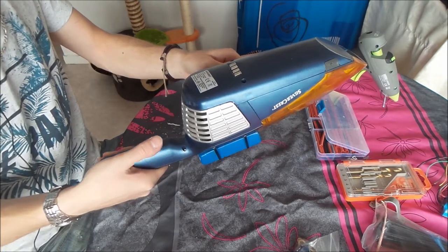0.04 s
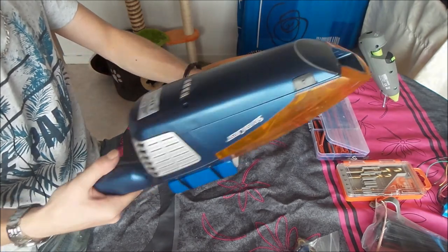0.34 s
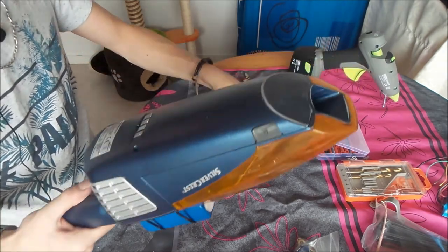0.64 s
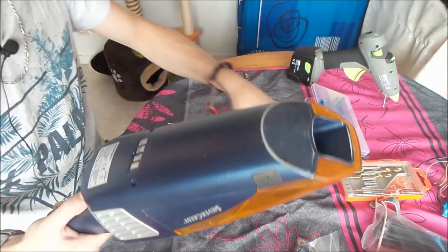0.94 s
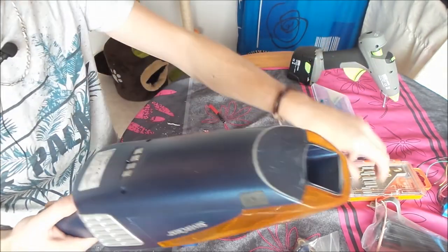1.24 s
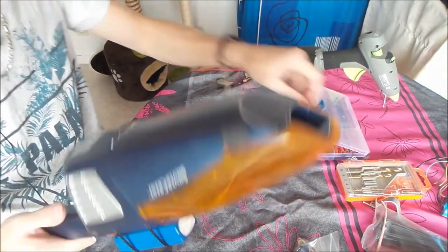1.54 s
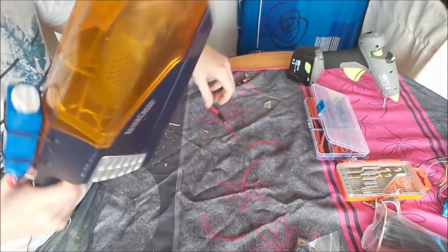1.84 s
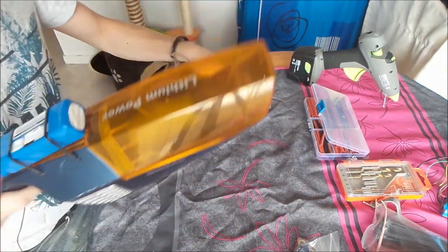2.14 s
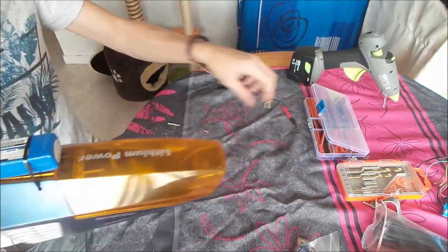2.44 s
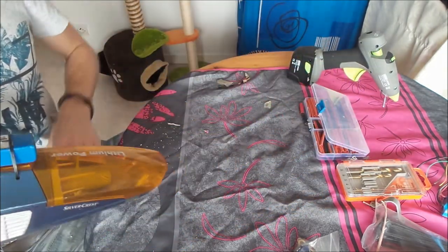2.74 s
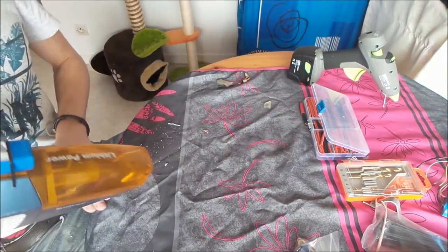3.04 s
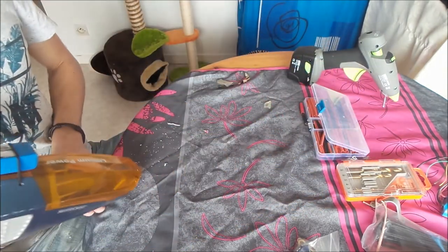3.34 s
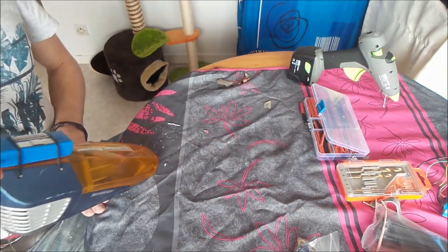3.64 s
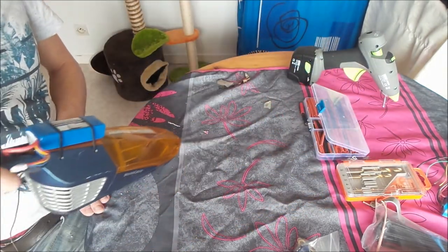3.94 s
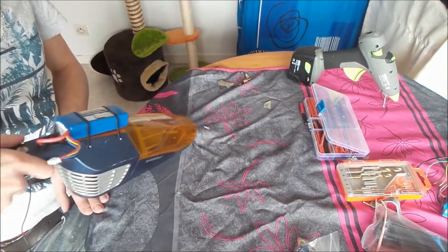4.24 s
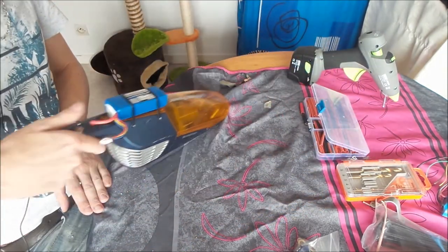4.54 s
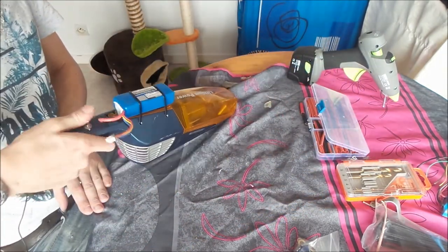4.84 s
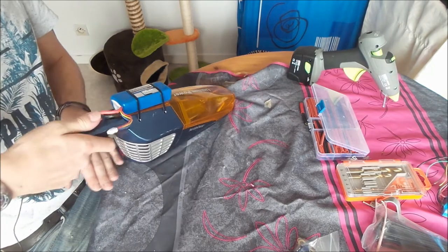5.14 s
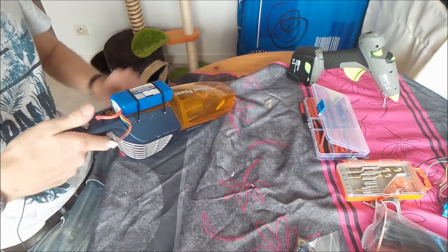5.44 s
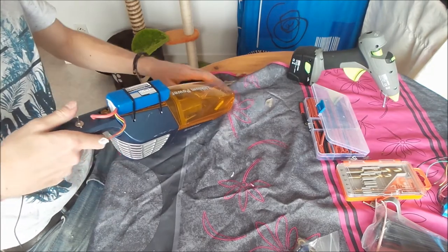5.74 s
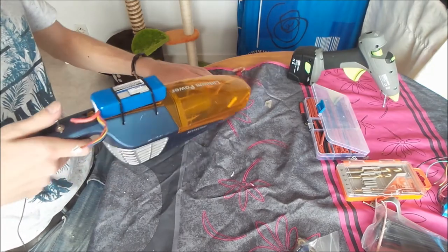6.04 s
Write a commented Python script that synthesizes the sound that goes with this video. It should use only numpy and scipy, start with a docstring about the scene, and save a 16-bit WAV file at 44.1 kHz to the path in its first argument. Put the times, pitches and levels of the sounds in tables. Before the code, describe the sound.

Hands turn over a cordless handheld vacuum, its plastic shell ticking, knocking and faintly rubbing. The switch snaps sharply and the small motor spins up fast to a whine over rushing air. A loose bearing soon adds a rough rattle and rasp. Another sharp click cuts the power and the fan coasts down in falling pitch. Everything is close to one microphone in a small, quiet room.

```python
"""A cordless handheld vacuum, close to one microphone in a small, quiet room.
Turned over in the hands, its plastic shell ticks, knocks and rubs. The switch snaps, the motor spins up
to a whine of shaft orders (multiples of its speed) over rushing air, and a loose bearing starts to rattle.
The switch is let go and the fan coasts down, shuddering at its critical speed, its orders sliding
through the housing's resonances."""
import sys
import numpy as np
from scipy import signal
from scipy.fft import rfft, irfft
from scipy.io import wavfile
from scipy.ndimage import uniform_filter1d

SR = 44100
rng = np.random.default_rng(int(sys.argv[2]) if len(sys.argv) > 2 else 0)


def digitize_waveform(pressure):
    """Quantize a signal to 16-bit integers and store it at the path in sys.argv[1].

    Rows of a 2-D input are taken as channels; values are limited to [-1, 1].
    """
    field = np.atleast_2d(pressure).T
    bounded = np.clip(field, -1, 1)
    quanta = np.round(bounded * 32767).astype(np.int16)
    wavfile.write(sys.argv[1], SR, quanta)


N = 272538
TIME = np.arange(N) / SR
ON_S, OFF_S = 2.984, 5.172  # the switch is pressed and let go
GRAZE_S, GRAZE_WIDTH_S = 4.786, 0.38  # the loose shaft grazes the bearing plate


def undb(db):
    """Decibels to gain."""
    return 10 ** (np.asarray(db) / 20)


def unit(x):
    """Scale to rms 1."""
    return x / np.sqrt(np.mean(x ** 2))


def since(start_s):
    """Seconds since a moment, 0 before it."""
    return np.maximum(TIME - start_s, 0)


def bell(centre_s, width_s):
    """A smooth swell from 0 to 1 and back."""
    return np.exp(-((TIME - centre_s) / width_s) ** 2)


def walk(rate_hz):
    """Random drift of rms 1 that changes course about rate_hz times a second."""
    steps = rng.standard_normal(4096)
    return unit(np.interp(TIME * rate_hz, np.arange(len(steps)), steps))


def colour(x, points):
    """Filter by a spectrum of points: frequency_hz, gain_db."""
    hz, db = np.transpose(points)
    bins_hz = np.fft.rfftfreq(2 * N, 1 / SR)
    gain = undb(np.interp(np.log(bins_hz + 1), np.log(hz), db))
    return irfft(rfft(x, 2 * N) * gain)[:N]


def resonate(x, modes):
    """Ring parallel resonances: pitch_hz, width_hz, gain_db."""
    out = 0
    for hz, width_hz, db in modes:
        b, a = signal.iirpeak(hz, hz / width_hz, fs=SR)
        out = out + undb(db) * signal.lfilter(b, a, x)
    return out


def edge(x, hz, kind, order=2):
    """Low-pass or high-pass."""
    return signal.sosfilt(signal.butter(order, hz, kind, fs=SR, output="sos"), x)


def room(x, t60_s=0.66, dull_hz=3240):
    """Diffuse echo of the small room; soft furnishings take the treble sooner."""
    t = TIME[:SR // 2]
    noise = rng.standard_normal(len(t))
    low = edge(noise, dull_hz, "low", order=1)
    tail = low * undb(-60 * t / t60_s) + 2.4 * (noise - low) * undb(-60 * t / (0.38 * t60_s))
    tail = tail * (t > .004)  # the first reflection reaches the microphone after 4 ms
    return signal.fftconvolve(x, tail / np.sqrt(np.sum(tail ** 2)))[:N]


def room_tone(level_db=-65, handling_db=3):
    """Faint room noise, lifted by the rustle of cloth once the vacuum is turned over."""
    # spectrum of the still room: frequency_hz, density_db
    still_room = [(30, -41), (90, -19), (170, -9), (300, -10), (450, -10.5), (750, -15), (1200, -17.5),
                  (2400, -27.5), (6000, -32), (15000, -31.5)]
    moving = np.clip((TIME - 1.6) / 0.7, 0, 1)
    noise = unit(colour(rng.standard_normal(N), still_room))
    return noise * undb(level_db + handling_db * moving + 0.54 * walk(4.9))


def clicks(body_ring=1.93, treble_ring=0.87):
    """Each blow rings the plastic and thuds in the struck part; the thud outlasts the treble."""
    # blows on shell and switch: start_s, level_db, body_hz, body_db, treble_db, mid_t60_s, room_db
    blows = [(0.042, -43.5, 445, 3, -11, 0.023, 8), (1.299, -28, 643, -7, -2.5, 0.03, 5),
             (1.442, -40, 700, -22, 1, 0.022, -3), (1.707, -48.5, 600, -1, -23, 0.018, 12),
             (1.742, -38.5, 700, -5, -2, 0.026, 3), (1.776, -23.5, 480, 8.5, -6, 0.016, -1),
             (1.951, -19, 990, -9, 0.5, 0.039, -2), (2.063, -45, 910, -23, 10, .015, 0),
             (2.240, -41, 900, -21, -5.5, 0.013, -3), (2.394, -33.5, 930, 13, -20, 0.042, -8),
             (2.486, -35.5, 910, 2.5, 0, 0.064, -1), (2.523, -33, 530, 16, -20, 0.032, -3),
             (2.548, -44, 950, 4, -1, 0.019, -3), (2.578, -38, 503, 10, -20, 0.02, 11),
             (2.5935, -15, 584, -9, -6, 0.018, -5), (2.939, -40, 660, -21, -10, 0.014, 0),
             (2.9829, -2.5, 1010, -7, 12, 0.014, 0), (5.171, -2, 935, -12, 9, 0.0087, -14)]
    # ring of the struck plastic: pitch_hz, width_hz, gain_db
    plastic_modes = [(1860, 450, 14), (3200, 1400, 5), (5470, 990, -3), (6900, 2800, 1.5), (9550, 380, -43)]
    direct, to_room = np.zeros(N + SR), np.zeros(N + SR)
    t = TIME[:SR // 5]
    for start_s, level_db, body_hz, body_db, treble_db, mid_t60_s, room_db in blows:
        crackle = rng.standard_normal(len(t))
        ring = resonate(crackle, plastic_modes)
        body = [(body_hz, 0.9 * body_hz, 0)]
        fade_db = -60 * t / mid_t60_s
        thud = unit(resonate(resonate(crackle, body), body)) * undb(body_db + fade_db / body_ring)
        mid = unit(edge(edge(ring, 1870, "high"), 5200, "low")) * undb(fade_db)
        treble = unit(edge(ring, 3260, "high")) * undb(treble_db + fade_db / treble_ring)
        attack = 1 - np.exp(-t / 0.00033)
        blow = edge((thud + mid + treble) * attack, 315, "high", order=4)
        peak_rms = np.sqrt(uniform_filter1d(blow ** 2, size=88).max())  # loudest 2 ms
        blow = blow * undb(level_db - 7.0) / peak_rms
        at = int(start_s * SR)
        direct[at:at + len(t)] += blow
        to_room[at:at + len(t)] += blow * undb(room_db)
    return direct[:N] + undb(-4.5) * room(to_room[:N])


def rubs(grain_db=3.0):
    """Hands rub the shell and grit slides in the dust cup: grainy friction that swells and dies away."""
    # rubs and slides: peak_s, level_db, rise_s, fall_s, centre_hz, width_hz
    strokes = [(0.104, -52.5, 0.0096, 0.011, 2400, 6700), (.37, -66, 0.55, 0.25, 1190, 3000),
               (1.835, -28, 0.0053, 0.015, 2320, 1290), (1.845, -53, 0.064, 0.021, 5000, 9000),
               (2.06, -44, 0.045, 0.034, 3950, 11400), (2.384, -50, 0.0053, 0.0084, 4480, 7000),
               (2.55, -51, 0.094, 0.081, 730, 890), (2.64, -50, 0.023, 0.026, 2900, 1800),
               (2.87, -57, 0.012, .014, 1500, 3500)]
    out = 0
    for peak_s, level_db, rise_s, fall_s, centre_hz, width_hz in strokes:
        grains = rng.standard_normal(N) * undb(grain_db * walk(500))
        swell = np.exp(-np.maximum((peak_s - TIME) / rise_s, (TIME - peak_s) / fall_s))
        out = out + undb(level_db) * swell * unit(resonate(grains, [(centre_hz, width_hz, 0)]))
    return out + undb(-11.0) * room(out)


def metal_ring(tap_s=1.298, gain_db=-50):
    """A tap leaves small metal parts ringing."""
    # partials of the metal parts: pitch_hz, level_db, t60_s
    partials = [(3020, -12, .15), (3806, -3, 0.18), (5330, -7, 0.15), (7000, -6, 0.41), (8950, 2, 0.33),
                (9080, -7, 0.25), (10470, -9, 0.37)]
    t = since(tap_s)
    ring = sum(undb(db - 60 * t / t60_s) * np.sin(2 * np.pi * hz * t) for hz, db, t60_s in partials)
    return undb(gain_db) * ring


def shaft_speed(cruise_hz=368.3, step_hz=15.4, sag_hz=3.0, spin_up_s=0.103, coast_s=1.13, drag=0.238):
    """Turns a second: the motor closes in on cruising speed; once off, friction and air drag slow it."""
    stepped = (1 + np.tanh((TIME - 4.025) / .06)) / 2  # the speed steps up a little at about 4 s
    driven_hz = cruise_hz + step_hz * stepped - sag_hz * bell(GRAZE_S, GRAZE_WIDTH_S)
    run_up = 1 - np.exp(-since(ON_S) / spin_up_s)
    friction = np.exp(-since(OFF_S) / coast_s)
    return driven_hz * run_up * friction / (1 + drag * (1 - friction))


def motor_states(strain_rise_s=0.052, strain_fall_s=0.19, loose_s=3.96, loosen_s=0.018, release_s=0.14):
    """Shares 0-1 of the motor's states: starting strain, smooth running, whirling, coasting."""
    age_s = since(ON_S)
    strain = (1 - np.exp(-age_s / strain_rise_s)) * np.exp(-age_s / strain_fall_s)
    loose = np.clip(since(loose_s) / loosen_s, 0, 1)
    driven = np.exp(-since(OFF_S) / release_s)
    return strain / strain.max(), 1 - loose, loose * driven, 1 - driven


def motor_gain(hz, strain_db, smooth_db, whirl_db, coast_db, power):
    """Gain of one sound: a level for each state times a power of the speed, plus the starting strain."""
    strain, smooth, whirling, coasting = motor_states()
    state = smooth * undb(smooth_db) + whirling * undb(whirl_db) + coasting * undb(coast_db)
    return np.hypot(strain * undb(strain_db), state * (hz / hz.max()) ** power)


def near_critical(hz, critical_hz=301.3, width_hz=36):
    """Nearness 0-1 to the speed at which the rotor shakes, on the way up and on the way down."""
    return np.exp(-((hz - critical_hz) / width_hz) ** 2)


def orders(turn, strengths_db, slow_db, rough):
    """Multiples of the shaft angle from the third up; each swells and flutters in the turbulent air."""
    out = 0
    for order, db in enumerate(strengths_db, start=3):
        angle = order * turn + rng.uniform(0, 2 * np.pi) + rough * walk(60)
        out = out + undb(db + slow_db * walk(6.5)) * (1 + rough * walk(50)) * np.sin(angle)
    return out


def rattle(turn, modes, low_hz, high_hz):
    """Scraping, strongest once a turn, rings a set of resonances."""
    scrape = rng.standard_normal(N) * (1 + np.cos(turn))
    ring = edge(resonate(scrape, modes), low_hz, "high", order=4)
    return unit(edge(ring, high_hz, "low", order=4))


def hum(turn, hz, strain_db=5, coast_db=-1.0):
    """Imbalance shakes the body once a turn, harder under torque; bearing play adds the second order."""
    # how well the body radiates the imbalance: speed_hz, level_db
    radiation = [(60, -92), (135, -49), (222, -43.5), (243, -31.5), (275, -19.5), (300, -18), (328, -25.5),
                 (358, -16), (382, -15)]
    strain, _, _, coasting = motor_states()
    radiated_db = np.interp(hz, *np.transpose(radiation))
    first = undb(radiated_db + strain_db * strain + coast_db * coasting + .5 * walk(12))
    second = motor_gain(hz, strain_db=-48, smooth_db=-29.5, whirl_db=-17.5, coast_db=-33.5, power=2.86)
    return first * np.sin(turn) + second * undb(1.2 * walk(25)) * np.sin(2 * turn)


def whine(turn):
    """Brushes and blades repeat on every turn."""
    # shaft orders, with 7, 14 and 21 lifted by the seven fan blades: order, level_db
    order_levels = [(3, -9), (4, -4), (5, -7), (6, -6), (7, -2), (8, -5), (9, -4), (10, -5), (11, -7),
                    (12, -5), (13, -8), (14, -1), (15, -4), (16, -2), (18, -1), (20, -6), (21, -1),
                    (22, -1), (24, -6), (25, -2), (26, -9), (27, 0), (28, -2), (31, -7), (41, -14)]
    strengths_db = np.interp(np.arange(3, 42), *np.transpose(order_levels))
    return orders(turn, strengths_db, slow_db=2, rough=.2)


def air(turn, depth=0.17, gust_db=1.3):
    """Turbulence behind the fan, pulsing with the shaft."""
    return rng.standard_normal(N) * (1 + depth * np.cos(turn)) * undb(gust_db * walk(28))


def fan(turn, hz, rush_db=13.0, vents_db=-4, critical_db=3, coast_whine_db=-3):
    """Whine and rush leave through housing and vents; the whine is clearest driven at full speed."""
    # what the housing lets out: frequency_hz, gain_db
    housing = [(25, -40), (70, -35), (200, -15), (300, -7.5), (480, -6), (700, -1), (1150, -2.5), (1470, 0),
               (2000, -9), (3400, -4), (5900, -10.5), (6400, -13.5), (8200, -14.5), (15500, -28.5)]
    # narrow resonances of the exhaust vents: pitch_hz, width_hz, gain_db
    vent_modes = [(5300, 150, -13), (6000, 210, 8), (7300, 77, -5), (8400, 150, 1), (9400, 90, -22),
                  (11000, 50, -8)]
    flow = motor_gain(hz, strain_db=-24, smooth_db=-21.0, whirl_db=-24.0, coast_db=-23, power=2.43)
    flow = flow * undb(critical_db * near_critical(hz))
    *_, coasting = motor_states()
    tones = undb(coast_whine_db * coasting) * (hz / hz.max()) ** 1.4 * whine(turn)
    through_housing = colour(tones + undb(rush_db) * air(turn), housing)
    return flow * (through_housing + undb(vents_db) * resonate(air(turn), vent_modes))


def bearing_chatter(turn, hz, scrape=0.03):
    """The shaft knocks in its bearing once a turn: a rough growl through the mount."""
    # resonances of the motor mount: pitch_hz, width_hz, gain_db
    mount_modes = [(840, 208, 1.5), (1210, 900, -9.5), (1713, 270, 0.5), (2480, 480, -16), (3590, 167, -1),
                   (5300, 280, -5), (7500, 400, -26)]
    gain = motor_gain(hz, strain_db=-22, smooth_db=-32, whirl_db=-26.5, coast_db=-27.5, power=0.88)
    knocks = orders(turn, np.zeros(44), slow_db=2, rough=.5)
    # the knocks are soft, and fewer a second carry less power
    knocks = edge(knocks, 3300, "low", order=4) * np.sqrt(hz / hz.max())
    growl = resonate(knocks + scrape * rng.standard_normal(N), mount_modes)
    return gain * edge(growl, 630, "high", order=6)


def shell_rattle(turn, hz):
    """The shell growls at the starting kick and rattles hard once the shaft is loose."""
    # resonances of the shell: pitch_hz, width_hz, gain_db
    shell_modes = [(858, 44, 1), (1449, 130, 4), (1672, 55, 13), (2280, 210, -1)]
    shaking = motor_gain(hz, strain_db=-31, smooth_db=-27, whirl_db=-16.5, coast_db=-16.5, power=2.3)
    kick = undb(-14.5) * bell(centre_s=3.075, width_s=0.046)
    return np.hypot(shaking, kick) * rattle(turn, shell_modes, low_hz=650, high_hz=2640)


def brush_hiss(turn, hz):
    """The motor's brushes hiss as they slide."""
    # resonances that the brushes hiss through: pitch_hz, width_hz, gain_db
    brush_modes = [(2550, 980, -18.5), (4500, 900, 20.5), (5320, 350, 15.5)]
    sliding = motor_gain(hz, strain_db=-27.5, smooth_db=-36.5, whirl_db=-28, coast_db=-32.5, power=1.5)
    return sliding * rattle(turn, brush_modes, low_hz=2240, high_hz=6060)


def shudder(turn, hz, gain_db=-19, coast_db=-4.0):
    """At the critical speed the rotor's knocks ring the motor case, more softly when it coasts."""
    # resonances of the motor case: pitch_hz, width_hz, gain_db
    case_modes = [(2010, 160, 7.5), (2520, 93, 4), (3120, 300, -10)]
    knocks = orders(turn, np.zeros(10), slow_db=1, rough=.3)
    ring = edge(resonate(knocks, case_modes), 2250, "high")
    *_, coasting = motor_states()
    return undb(gain_db + coast_db * coasting) * near_critical(hz) * ring


def whirl(turn, gain_db=-17, damped_db=-7, wobble_rad=0.36, flicker_db=3):
    """The loose shaft orbits a little slower than it spins: unsteady tones between the orders."""
    # whirl tones: multiple of the shaft speed, level_db
    whirl_tones = [(1.93, -4.5), (2.19, -13), (2.51, -12), (3.855, 1), (4.39, -11), (5.06, -10)]
    tones = sum(undb(db + flicker_db * walk(21.89)) * np.sin(multiple * turn + wobble_rad * walk(25))
                for multiple, db in whirl_tones)
    _, _, whirling, _ = motor_states()
    grazing = bell(centre_s=4.78, width_s=0.34)  # touching the plate damps the tones
    return whirling * undb(gain_db + damped_db * grazing) * tones


def plate_rasp(turn, level_db=-18):
    """Midway through its whirl the shaft grazes the bearing plate, which rasps."""
    # resonances of the bearing plate: pitch_hz, width_hz, gain_db
    plate_modes = [(3440, 88, -12), (3390, 61, 4), (3660, 180, -3)]
    rasp = rattle(turn, plate_modes, low_hz=2880, high_hz=4180)
    return undb(level_db) * bell(GRAZE_S, GRAZE_WIDTH_S) * rasp


def hollow_body(turn, hz, gain_db=-26, scrape=0.84):
    """The freewheeling shaft sounds the body: each order swells as it slides through a resonance."""
    # resonances of the hollow body: pitch_hz, width_hz, gain_db
    cavity_modes = [(855, 140, 11.5), (2620, 150, -1), (5570, 150, -8.5)]
    knocks = unit(orders(turn, np.zeros(22), slow_db=1, rough=.5))
    ring = resonate(knocks + scrape * rng.standard_normal(N), cavity_modes)
    *_, coasting = motor_states()
    gain = undb(gain_db) * coasting * (hz / hz.max()) ** 1.11
    return gain * unit(edge(ring, 840, "high", order=4))


def vacuum():
    """Every motor sound follows the shaft angle, turn; all but the hum echo in the room."""
    hz = shaft_speed()
    turn = 2 * np.pi * np.cumsum(hz * (1 + 0.001288 * walk(14))) / SR
    started = np.clip((TIME - ON_S) / 0.0038, 0, 1)
    bearing = bearing_chatter(turn, hz) + whirl(turn) + plate_rasp(turn)
    body = shell_rattle(turn, hz) + shudder(turn, hz) + hollow_body(turn, hz)
    direct = started * (fan(turn, hz) + brush_hiss(turn, hz) + bearing + body)
    return started * hum(turn, hz) + direct + undb(-10.0) * room(direct)


def scene():
    """One close microphone, the same in both channels."""
    mono = vacuum() + clicks() + metal_ring() + rubs() + room_tone()
    return np.array([mono, mono])


def record(dry, top_hz=15900):
    """The highest peaks clip at full scale, and the top is cut steeply."""
    top_cut = signal.ellip(10, .1, 80, top_hz, fs=SR, output="sos")
    return signal.sosfilt(top_cut, np.clip(dry, -1, 1))


dry = scene()
out = record(dry)
digitize_waveform(out)
```